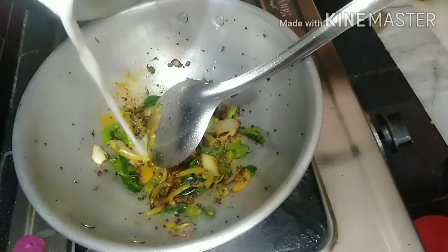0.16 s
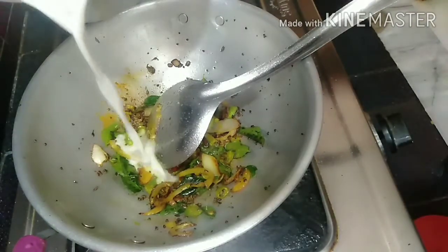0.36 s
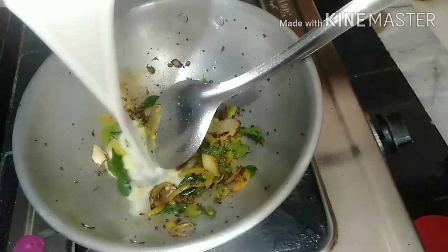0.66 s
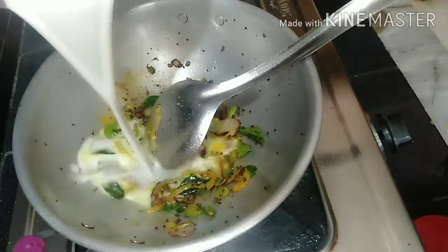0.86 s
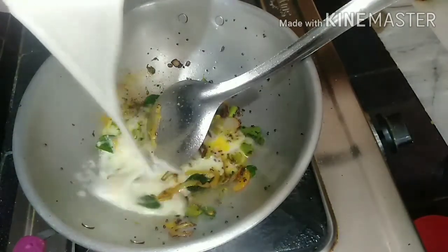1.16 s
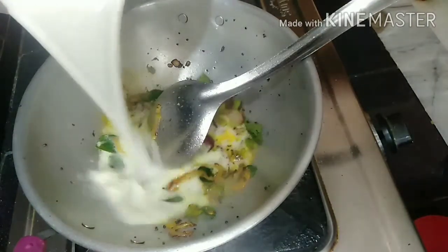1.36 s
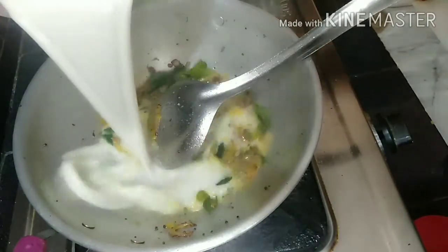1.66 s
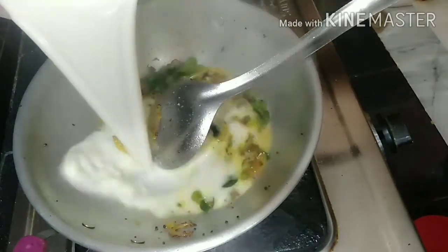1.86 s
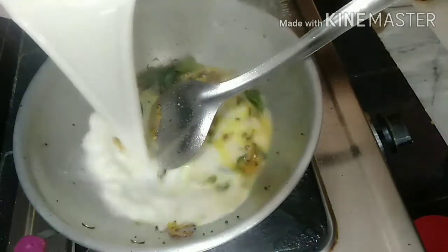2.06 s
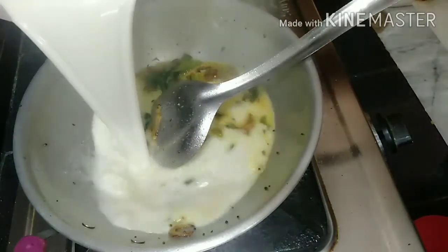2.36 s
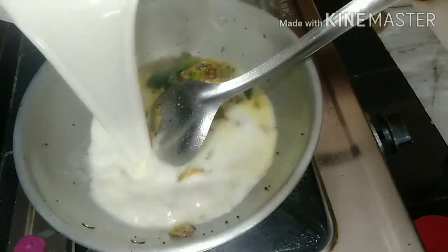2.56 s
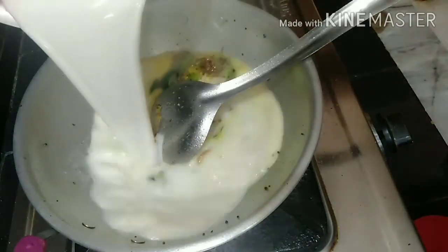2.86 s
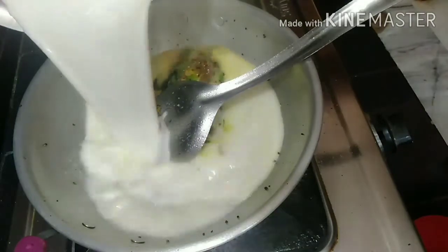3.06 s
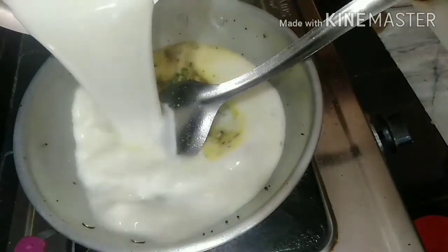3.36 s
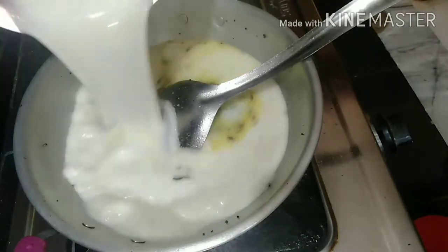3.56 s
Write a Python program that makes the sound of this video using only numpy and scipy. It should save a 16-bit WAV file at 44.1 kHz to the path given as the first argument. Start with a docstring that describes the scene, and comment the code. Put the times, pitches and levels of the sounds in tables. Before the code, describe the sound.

Fierce bright sizzle as milk floods a hot steel pan, crackling, bubbling, then fading to near quiet

```python
"""Milk poured onto hot oil, spices and vegetables in a steel pan seethes, close to a microphone in a small kitchen.
Random pops, coloured by filters, make its dense sizzle and coarser boil; both sink as the pan floods and cools.
Decaying sines make the ringing bubbles and faint steel modes; shaped bursts make the first steam flash, the
single spits of oil and late slaps of the stream. Frying oil is steady pops, the gas flame is filtered noise,
and two wavering low sines make the hum underneath."""
import sys
import numpy as np
from scipy import signal
from scipy.fft import rfft, irfft
from scipy.io import wavfile
from scipy.ndimage import map_coordinates

SR = 44100
rng = np.random.default_rng(int(sys.argv[2]) if len(sys.argv) > 2 else 0)


def generate_wav(signal):
    """Clip the signal to [-1, 1] and save it as 16-bit WAV at the path in sys.argv[1]."""
    frames = np.transpose(np.atleast_2d(signal))
    scaled = np.clip(frames, -1, 1) * 32767
    pcm = np.round(scaled).astype(np.int16)
    wavfile.write(sys.argv[1], SR, pcm)


N = 163170  # length [samples]


def undb(db):
    """Logarithmic level: decibels become an amplitude gain."""
    return 10 ** (np.asarray(db) / 20)


def unit(x):
    """Normalisation: scale to rms 1."""
    return x / np.sqrt(np.mean(x ** 2))


def convolve(x, h):
    """Linear filtering: pass a sound through an impulse response."""
    return signal.fftconvolve(x, h)[:N]


def response(points, size=4096):
    """Minimum phase: a causal impulse response from a (frequency [Hz], level [dB]) curve by way of its cepstrum."""
    hz, db = np.array(points, float).T
    f = np.maximum(np.fft.rfftfreq(size, 1 / SR), 1)
    curve_db = np.interp(np.log(f), np.log(hz), db)
    cepstrum = irfft(np.log(undb(curve_db)))
    # folding the cepstrum forward in time makes the response causal
    cepstrum[1:size // 2] *= 2
    cepstrum[size // 2 + 1:] = 0
    return irfft(np.exp(rfft(cepstrum)))


def colour(x, points):
    """Spectral shaping: filter a flat sound without changing its power."""
    h = response(points)
    return convolve(x, h / np.linalg.norm(h))


def walk(rate):
    """Random modulation: smooth drift with spread 1, through `rate` random knots per second."""
    knots = rng.standard_normal(N // 10)
    return unit(map_coordinates(knots, [np.arange(N) / SR * rate], order=2, mode="wrap"))


POP_SPREAD_DB = 5.3


def pops(rate):
    """Shot noise: bubbles burst at random, many small and a few large, with power near 1."""
    chance = np.clip(rate / SR, 0, 1)
    hit = rng.random(N) < chance
    size = unit(undb(POP_SPREAD_DB * np.clip(rng.standard_normal(N), -2, 2)))
    polarity = np.sign(rng.standard_normal(N))
    return hit * size * polarity / np.sqrt(chance)


ROOM_T60_S, ROOM_DB = 0.25, -13
PAN_ECHO_DECAY_S, PAN_ECHO_DB = 0.0021, 1


def scatter(x):
    """Diffuse reflection: each pop has its own spot, and so its own quick echoes from pan and kitchen."""
    def tail(decay, db):
        """Energy decay: smoothed power of the pops sets the envelope of fresh noise."""
        keep = np.exp(-1 / (decay * SR))
        power = signal.lfilter([1 - keep], [1, -keep], x ** 2 + 1e-18)
        return undb(db) * np.sqrt(power) * rng.standard_normal(N)

    pan = tail(PAN_ECHO_DECAY_S, PAN_ECHO_DB)
    room = tail(ROOM_T60_S / np.log(1000), ROOM_DB)
    return (x + pan + room) / np.sqrt(1 + undb(PAN_ECHO_DB) ** 2 + undb(ROOM_DB) ** 2)


def burst(t, start, decay):
    """Transient envelope: sudden rise and exponential fall."""
    return (t >= start) * np.exp(-np.maximum(t - start, 0) / decay)


# spectrum of the flame and kitchen air: (frequency [Hz], relative density [dB per Hz])
FLAME_SPECTRUM = [(25, 4.5), (50, -9), (90, -3), (140, -2.5), (180, -3.5), (290, -12.5), (400, -4.5),
                  (520, -4.5), (660, 5.5), (800, -4), (1100, -12), (1750, -10), (2400, -14), (6000, -24.5)]
FLAME_DB = -59


def flame():
    """Broadband noise: the soft roar of the gas flame, with the kitchen air."""
    return undb(FLAME_DB) * colour(rng.standard_normal(N), FLAME_SPECTRUM)


# low hum tones: (frequency [Hz], level offset [dB])
HUM_TONES = [(100, 1.5), (121, 0.5)]
# swell of the lower tone, before its offset: (time [s], level [dB])
LOWER_HUM_SWELL = [(0.0, -72), (0.43, -70), (0.49, -87), (0.57, -74), (0.97, -73), (1.0, -80), (1.56, -65),
                   (1.69, -73), (2.17, -78), (2.34, -61), (2.52, -66), (2.63, -84), (2.69, -67),
                   (2.85, -97), (2.92, -80.5), (3.7, -84)]
# swell of the upper tone, before its offset: (time [s], level [dB])
UPPER_HUM_SWELL = [(0.0, -70), (0.24, -60), (0.3, -71), (1.69, -70.5), (1.87, -87), (2.51, -69.5),
                   (2.59, -82), (3.53, -65), (3.7, -78)]
HUM_WAVER, HUM_WAVER_PER_S = 0.34, 14  # spread as a fraction of amplitude and as phase [rad]


def hum(t):
    """Amplitude and phase modulation: two low sine tones swell and waver."""
    out = np.zeros(N)
    for (hz, db), swell in zip(HUM_TONES, (LOWER_HUM_SWELL, UPPER_HUM_SWELL)):
        amplitude = 1 + HUM_WAVER * walk(HUM_WAVER_PER_S)
        phase = HUM_WAVER * walk(HUM_WAVER_PER_S)
        tone = amplitude * np.sin(2 * np.pi * hz * t + phase)
        swell_db = np.interp(t, *np.array(swell).T)
        out += unit(tone) * undb(db + swell_db)
    return out


# spectrum of fine pops in oil and milk: (frequency [Hz], relative density [dB per Hz])
SIZZLE_SPECTRUM = [(300, -27), (1000, -17), (2500, -6), (3700, -4.5), (4500, 0), (7000, -0.5), (10000, 0.5),
                   (13000, -0.5), (16000, -2)]
FRY_DB, FRY_POPS_PER_S = -64.5, 16000


def frying():
    """Stationary shot noise: the spices fizz quietly in the oil."""
    return undb(FRY_DB) * colour(pops(FRY_POPS_PER_S), SIZZLE_SPECTRUM)


BOIL_POPS_PER_S = 4000  # for slaps, and for the boil at full activity
# slaps of the stream in the pool: (time [s], level [dB], decay [s])
STREAM_SLAPS = [(3.385, -62, 0.022), (3.499, -54.5, 0.017), (3.56, -45.5, 0.0028), (3.569, -57.5, 0.037)]
# spectrum of a slap: (frequency [Hz], relative level [dB])
SLAP_SPECTRUM = [(300, -6), (750, 4), (1100, 0), (1650, 0), (2200, -7), (3000, 2), (4500, -1), (8000, -13),
                 (16000, -38)]


def slaps(t):
    """Impact transients: the thick stream splashes softly in the pool."""
    envelope = sum(undb(db) * burst(t, start, decay) for start, db, decay in STREAM_SLAPS)
    return colour(scatter(envelope * pops(BOIL_POPS_PER_S)), SLAP_SPECTRUM)


# spits of oil, before the common trim: (time [s], level [dB])
OIL_SPITS = [(.009, -33), (0.1753, -33.5), (0.618, -32), (0.976, -26), (1.231, -23), (1.773, -19),
             (1.903, -23), (2.895, -28), (3.126, -28), (3.138, -20.5), (3.225, -31), (3.280, -27),
             (3.334, -32), (3.389, -29), (3.414, -25.5), (3.431, -36), (3.446, -31), (3.474, -26.5),
             (3.501, -24.5), (3.515, -35), (3.554, -29), (3.617, -33)]
# spectrum of a spit: (frequency [Hz], relative level [dB])
SPIT_SPECTRUM = [(300, -6), (700, 2), (1500, -2), (3000, 4.5), (5000, 9), (7000, 4.5), (10000, 7),
                 (16000, 1.5)]
SPIT_TRIM_DB, SPIT_DECAY_S, SPIT_PUFF_DB = -5, 0.0017, -10.5  # puff level is relative to its crack


def spits(t):
    """Impulse excitation: single drops burst in the oil with a sharp crack and a tiny puff."""
    puffs = sum(undb(db + SPIT_PUFF_DB) * burst(t, start, SPIT_DECAY_S) for start, db in OIL_SPITS)
    cracks = sum(undb(db) * (np.arange(N) == int(start * SR)) for start, db in OIL_SPITS)
    noise = np.sign(rng.standard_normal(N))
    return undb(SPIT_TRIM_DB) * colour(cracks + puffs * noise, SPIT_SPECTRUM)


SIZZLE_POPS_PER_S = 14000  # for the splash, and for the sizzle at full activity
SPLASH_S, SPLASH_ATTACK_S, SPLASH_HOLD_S, SPLASH_DECAY_S = 0.196, 0.0076, 0.063, .05  # hold includes attack
SPLASH_DB = -47.5
# spectrum of the steam flash: (frequency [Hz], relative level [dB])
SPLASH_SPECTRUM = [(1000, -20), (3500, -7), (4200, -1.5), (5500, -6), (6400, -4.5), (9000, 0.5),
                   (11500, -0.5), (13000, -1), (13600, 6), (14500, -5), (16000, -0.5)]


def splash(t):
    """Flash evaporation: the first thin stream turns to steam in one short burst of pops."""
    age = t - SPLASH_S
    attack = np.clip(age / SPLASH_ATTACK_S, 0, 1)
    decay = np.exp(-np.maximum(age - SPLASH_HOLD_S, 0) / SPLASH_DECAY_S)
    steam = scatter(attack * decay * pops(SIZZLE_POPS_PER_S))
    return undb(SPLASH_DB) * colour(steam, SPLASH_SPECTRUM)


# ringing of the pan under the boil: (frequency [Hz], t60 [s], level [dB])
STEEL_MODES = [(675.6, 0.39, -21), (1008, 0.21, -21), (1898, 0.11, -19), (2699, 0.47, -19)]


def ring(x, t):
    """Modal resonance: the boil makes the steel ring faintly."""
    out = np.zeros(N)
    for hz, t60, db in STEEL_MODES:
        mode = np.sin(2 * np.pi * hz * t) * np.exp(-t * np.log(1000) / t60)
        out += undb(db) * convolve(x, unit(mode) / np.sqrt(N))  # mode with energy 1
    return out


BUBBLE_COUNT, BUBBLE_LOW_HZ, BUBBLE_HIGH_HZ = 2000, 1690, 2097
BUBBLE_CYCLES, BUBBLE_DB = 9.6, 1.5  # cycles to fall to 1/e; largest bubble relative to the boil
FROTH_PEAK_S, FROTH_WIDTH_S = 1.24, 0.99


def bubbles(t, level_db):
    """Damped oscillation: larger bubbles ring a few cycles, most while milk spreads over the bare hot steel."""
    out, age = np.zeros(N + 1024), t[:1024]
    swell = undb(level_db + BUBBLE_DB) * np.exp(-((t - FROTH_PEAK_S) / FROTH_WIDTH_S) ** 2)
    for when, pitch, size in rng.random((BUBBLE_COUNT, 3)):
        i = int(when * N)
        hz = BUBBLE_LOW_HZ * (BUBBLE_HIGH_HZ / BUBBLE_LOW_HZ) ** pitch
        tone = np.sin(2 * np.pi * hz * age) * np.exp(-age * hz / BUBBLE_CYCLES)
        out[i:i + 1024] += swell[i] * size ** 2 * tone
    return out[:N]


SEETHE_BAND_HZ, HISS_FROM_HZ = (4600, 8200), 9800
FLICKER_DB, FLICKER_PER_S = 0.86, 90


def sizzle(fine_pops, fine_db, seethe_db):
    """Band modulation: fine pops are coloured, their seething band follows its own level, the top hiss flickers."""
    fizz = colour(scatter(fine_pops), SIZZLE_SPECTRUM)
    seethe_filter = signal.butter(3, SEETHE_BAND_HZ, "band", fs=SR, output="sos")
    hiss_filter = signal.butter(2, HISS_FROM_HZ, "high", fs=SR, output="sos")
    seethe = signal.sosfiltfilt(seethe_filter, fizz)
    hiss = signal.sosfiltfilt(hiss_filter, fizz)
    # each band is already in the fizz, so only its change of gain is added
    seethe_change = seethe * (undb(seethe_db - fine_db) - 1)
    hiss_change = hiss * (undb(FLICKER_DB * walk(FLICKER_PER_S)) - 1)
    return fizz + seethe_change + hiss_change


# spectrum of the coarse boil: (frequency [Hz], relative density [dB per Hz])
BOIL_SPECTRUM = [(280, -23.5), (480, -10.5), (750, -4), (1200, -8.5), (1450, -5), (1650, 1.5), (1950, -3),
                 (2250, -4.5), (2650, 1), (3050, -3.5), (3600, -10), (6000, -19.5)]
FULL_DB, THINNING = -37, .6  # fine level of full activity; pop rate follows power to this exponent
SIZZLE_TRIM_DB, BOIL_TRIM_DB, POUR_RISE_DB_PER_S = -2, -2.5, 147  # the rise leads up to the first POUR_LEVELS row
SPUTTER_DB, SPUTTER_PER_S, SURGE_DB, SURGE_PER_S = 0.57, 230, 0.86, 28
# the pour, before trims and sputter:
# (time [s], level of the seething 7 kHz band [dB], level of the fine sizzle [dB], level of the coarse boil [dB])
POUR_LEVELS = [(0.33, -51.5, -51.5, -60.5), (0.47, -40.5, -40.5, -52), (0.57, -39.5, -40, -50.5),
               (0.62, -33.5, -36.5, -46), (0.66, -40, -36.5, -53.5), (0.69, -38, -37, -51),
               (0.95, -36.5, -35.5, -47), (1.02, -36, -38, -45), (1.13, -41, -37, -47),
               (1.16, -38, -36, -45), (1.62, -38, -36.5, -45.5), (1.66, -38.5, -38, -48),
               (2.15, -40.5, -38, -47.5), (2.47, -43.5, -39.5, -50), (2.78, -42.5, -41, -53),
               (2.88, -46, -43.5, -57.5), (3.12, -47.5, -45, -54), (3.14, -50, -47, -57),
               (3.15, -49.5, -47.5, -57), (3.52, -55, -54, -63), (3.58, -57, -63, -56.5),
               (3.6, -54.5, -56.5, -67), (3.67, -62, -55.5, -78), (3.7, -72, -63, -83)]


def pour(t):
    """Boiling on hot steel: fine pops and coarser bubbles sputter together and thin out as the pan cools."""
    times, *levels = np.array(POUR_LEVELS).T
    seethe_db, fine_db, coarse_db = (np.interp(t, times, db) for db in levels)
    sputter_db = SPUTTER_DB * walk(SPUTTER_PER_S) + SURGE_DB * walk(SURGE_PER_S)
    onset_db = -POUR_RISE_DB_PER_S * np.maximum(times[0] - t, 0)
    shared_db = sputter_db + onset_db
    activity = undb(fine_db - FULL_DB) ** (2 * THINNING)
    fine_pops = pops(SIZZLE_POPS_PER_S * activity) * undb(fine_db + shared_db + SIZZLE_TRIM_DB)
    coarse_pops = pops(BOIL_POPS_PER_S * activity) * undb(coarse_db + shared_db + BOIL_TRIM_DB)
    boil = scatter(coarse_pops)
    fizz = sizzle(fine_pops, fine_db, seethe_db)
    return fizz + colour(boil, BOIL_SPECTRUM) + ring(boil, t) + bubbles(t, coarse_db)


WALLS_DELAY_S, WALLS_DECAY_S, WALLS_DB = 0.00259, 0.017, -15


def walls(x, t):
    """Comb filtering: fixed reflections from stove and walls interfere a little with the direct sound."""
    h = rng.standard_normal(N) * np.exp(-t / WALLS_DECAY_S) * (t > WALLS_DELAY_S)
    return x + undb(WALLS_DB) * convolve(x, h / np.linalg.norm(h))


def scene():
    """Superposition: pan and kitchen add up; one microphone feeds both channels."""
    t = np.arange(N) / SR
    pan = frying() + slaps(t) + spits(t) + splash(t) + pour(t)
    mono = flame() + hum(t) + walls(pan, t)
    return np.array([mono, mono])


# microphone port resonances: (frequency [Hz], gain [dB])
PORT_RESONANCES = [(20, -2.5), (3200, 1), (3750, -1), (4200, 1), (5850, 2), (6300, 8), (6800, 14.5),
                   (7300, 11), (7850, 8.5), (8450, 2.5), (9700, 2), (11000, -0.5), (12200, 4.5), (13200, 3),
                   (14500, 8.5), (15400, 14.5)]
TOP_HZ = 15520


def record(dry):
    """Cavity resonance: the microphone port rings in the treble; a low-pass filter cuts the top steeply."""
    lowpass = signal.firwin(1601, TOP_HZ, window=("kaiser", 8), fs=SR)
    port = response(PORT_RESONANCES)
    return np.array([signal.fftconvolve(convolve(ch, port), lowpass, mode="same") for ch in dry])


dry = scene()
out = record(dry)
generate_wav(out)
```